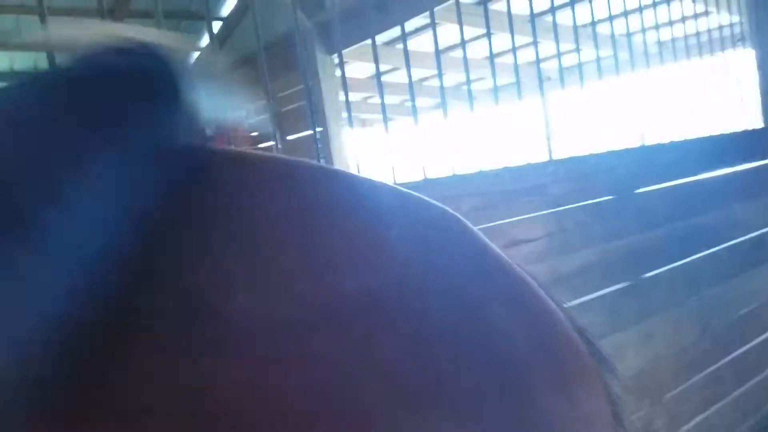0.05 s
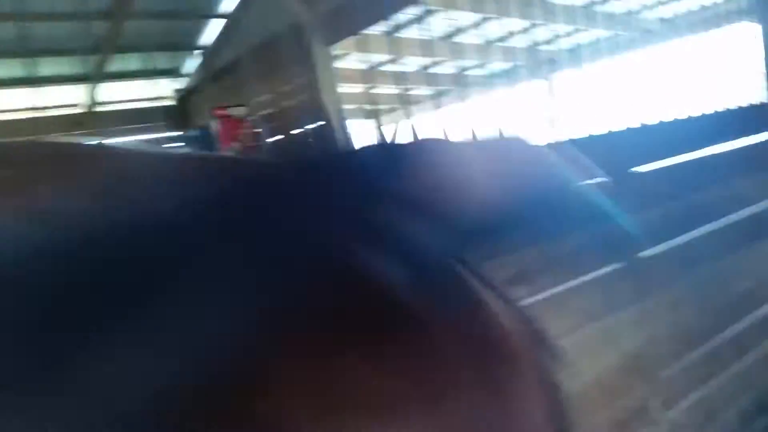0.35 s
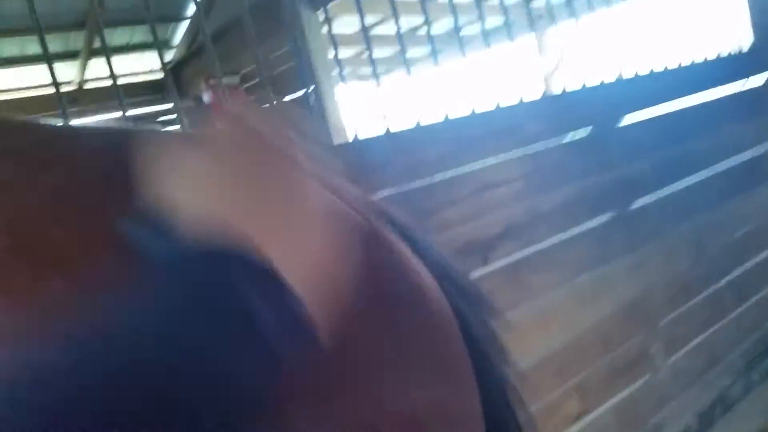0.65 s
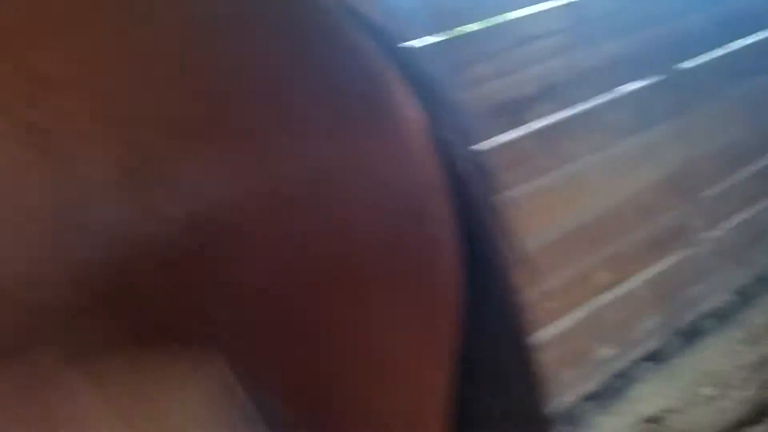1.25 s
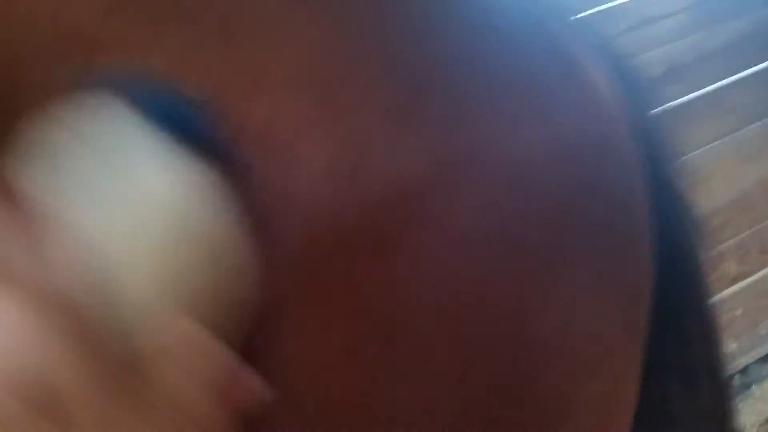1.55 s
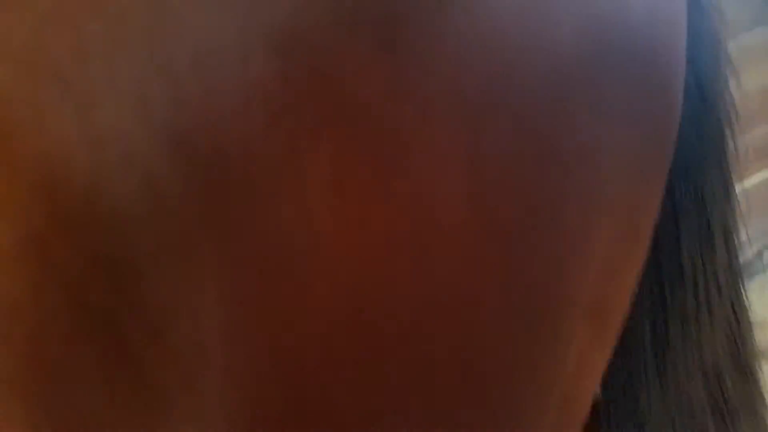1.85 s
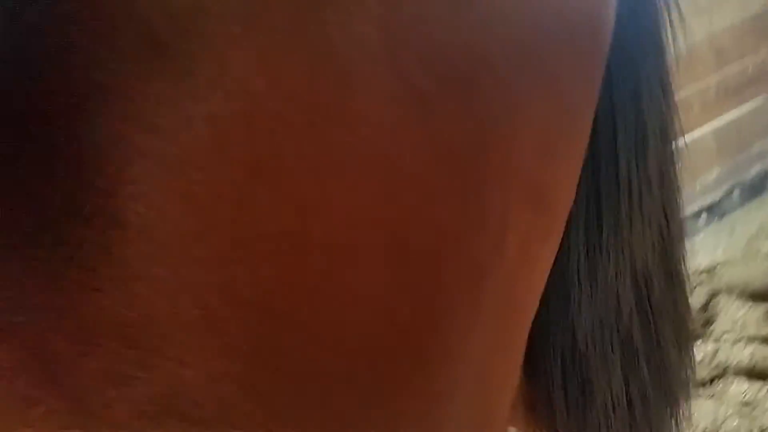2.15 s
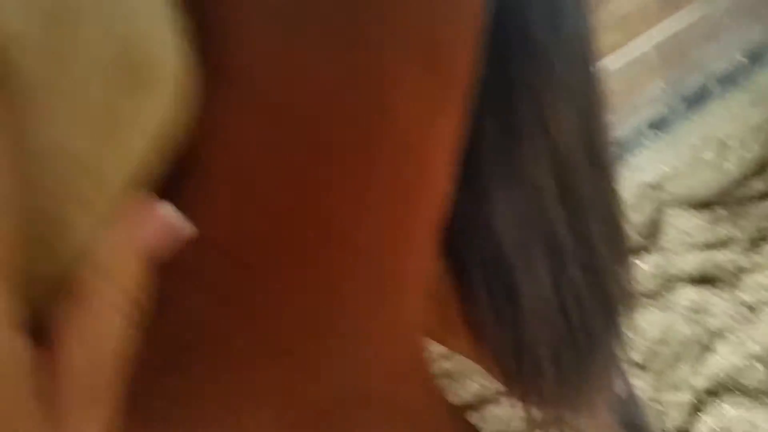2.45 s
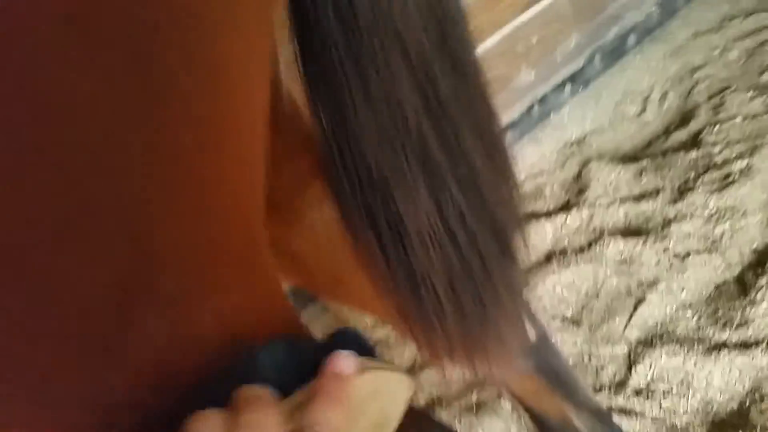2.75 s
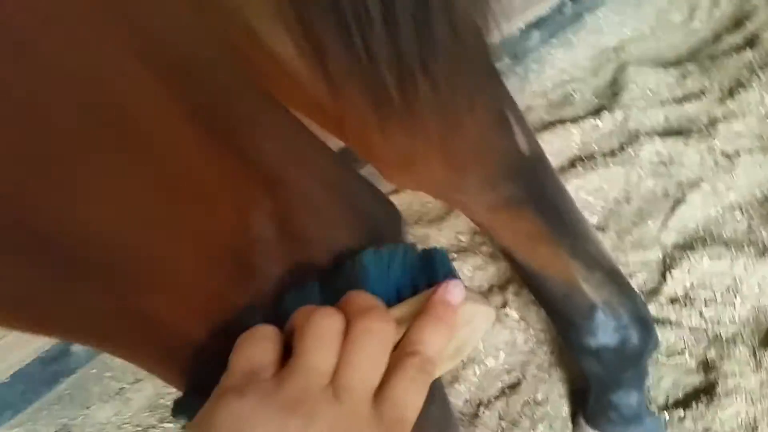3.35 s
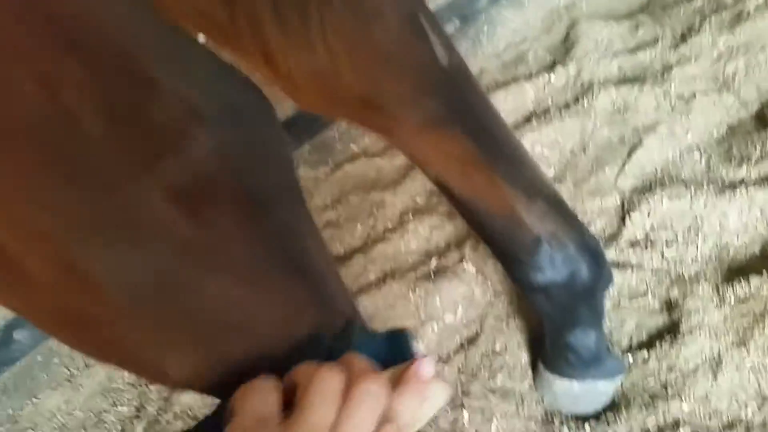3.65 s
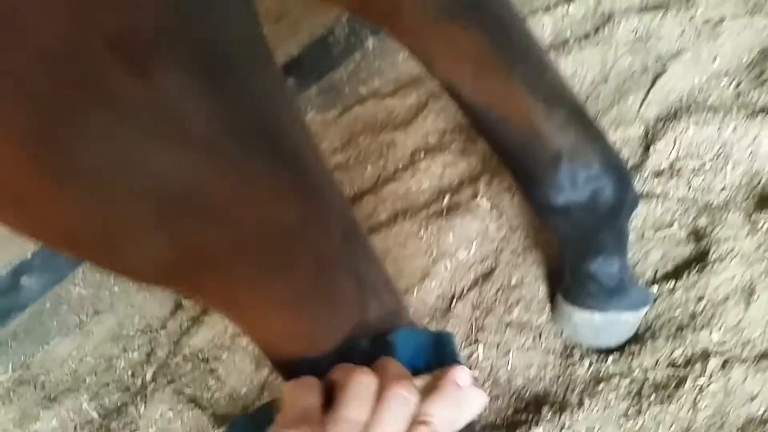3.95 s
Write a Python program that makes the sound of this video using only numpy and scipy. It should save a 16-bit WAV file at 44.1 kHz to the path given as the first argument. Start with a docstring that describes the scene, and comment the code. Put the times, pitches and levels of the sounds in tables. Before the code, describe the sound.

Close, quiet brush strokes hiss and rub through a horse's coat, followed by a run of low, soft knocks as the brushing continues. The barn hums faintly behind, and the hand-held microphone rumbles a little.

```python
"""Brush strokes swish through a horse's coat, close to a hand-held camera in a wooden stall.
Each stroke hisses at the bristle tips and rubs a dull note out of the body. Now and then the brush
judders or a bristle ticks; later it bumps along the flank and leg. Behind it lie the barn's low
drone and hum, the rumble of the moving camera and the hiss of two unlike microphones."""
import sys
import numpy as np
from scipy.fft import rfft, irfft, next_fast_len
from scipy.io import wavfile
from scipy.ndimage import map_coordinates

SR = 44100
rng = np.random.default_rng(int(sys.argv[2]) if len(sys.argv) > 2 else 0)


def wrap_up_sound(samples):
    """Save the sound to the file named by the first command line argument, as 16-bit audio."""
    columns = np.atleast_2d(samples).T
    # keep every value between -1 and 1, then stretch to whole-number steps
    tamed = np.clip(columns, -1, 1)
    steps = np.round(tamed * 32767).astype(np.int16)
    wavfile.write(sys.argv[1], SR, steps)


N = 176400
TIME = np.arange(N) / SR

# The coat, rump and flank from close by. Each row: frequency in Hz, relative level in dB.
COAT_SPECTRUM = [(200, -55), (600, -0.5), (1000, 2.5), (1700, 1.5), (2500, 2.5), (4000, 3.5), (5600, -1.5),
                 (7200, 3), (10000, -9), (12500, -7), (15000, -4)]
RUMP_SPECTRUM = [(60, -42), (170, -1), (280, 3.5), (390, -2.5), (450, -3), (510, -5.5), (640, -11.5),
                 (1100, -16.5), (2500, -17), (6000, -53)]
FLANK_SPECTRUM = [(60, -28), (190, 5), (250, -1), (370, -3), (440, -12.5), (700, -18), (1100, -19.5),
                  (2500, -35), (6000, -50)]
# The swish leans to the left microphone. Each row: frequency in Hz, left minus right in dB.
COAT_LEAN = [(500, 9), (1500, 5.5), (3000, 4), (5200, 0.5), (7200, 6.5), (9500, 20), (12000, 27),
             (14500, 6)]


def brush(flank_from_s=2.3):
    """Each stroke drives the swish of the hair, the hiss of the tips and the rub on rump or flank."""
    hair = unit(filtered(rush(COAT_SPECTRUM), lambda hz: pan(along(COAT_LEAN, hz))))
    hair *= flutter(rate=500, rough_db=0.44)
    hair *= pressure(layer=0, arch_db=5.5, touch_db=4.5, lift_db=7, rise_db_per_s=80, fall_db_per_s=111)
    tips = unit(tip_noise() * pan(-10.5)) * flutter(rate=130, rough_db=1)
    tips *= pressure(layer=1, arch_db=5.5, touch_db=4.5, lift_db=7, rise_db_per_s=126, fall_db_per_s=256)
    rub = np.where(TIME > flank_from_s, rush(FLANK_SPECTRUM), rush(RUMP_SPECTRUM)) * pan(2.4)
    rub *= flutter(rate=60, rough_db=2.5)  # bristles catch and slip in clumps
    rub *= pressure(layer=2, arch_db=7, touch_db=2, lift_db=9, rise_db_per_s=175, fall_db_per_s=128)
    return hair + tips + hollow(rub)


# Each row: touch, time to hardest pressure and length in seconds, then swish, hiss and rub in dB.
BRUSH_STROKES = [(0.264, 0.093, 0.16, -66.5, -64, -61), (0.397, 0.045, 0.038, -56, -41.5, -52),
                 (0.683, 0.15, 0.23, -64.5, -70, -52), (0.915, 0.05, 0.27, -52.5, -44.5, -48.5),
                 (1.113, 0.076, 0.31, -60, -66, -53.5), (1.44, 0.17, 0.23, -67.5, -78, -51.5),
                 (1.664, .07, 0.19, -51, -51, -57.5), (1.797, 0.089, .19, -45.5, -38, -55.5),
                 (2.002, 0.035, 0.2, -59, -68, -53.5), (2.363, 0.072, 0.22, -63, -63.5, -56),
                 (2.605, 0.13, 0.19, -49, -50, -60), (2.756, 0.064, 0.29, -56, -48.5, -43),
                 (3.047, 0.058, 0.23, -57, -49, -49.5), (3.256, 0.23, 0.54, -58, -53.5, -55.5),
                 (3.693, 0.043, 0.32, -57, -46.5, -48.5)]


def pressure(layer, arch_db, touch_db, lift_db, rise_db_per_s, fall_db_per_s, contact_s=0.015):
    """Gain of one layer: a stroke swells in, steps up on contact, arches, drops on lifting and fades."""
    power = 0
    for touch, hardest, length, *levels in BRUSH_STROKES:
        t = TIME - touch
        before, after = np.maximum(-t, 0), np.maximum(t - length, 0)
        arch = arch_db * np.interp(t, [0, min(hardest, length), length], [1, 0, 1])
        steps = touch_db * np.minimum(before / contact_s, 1) + lift_db * np.minimum(after / contact_s, 1)
        fades = rise_db_per_s * before + fall_db_per_s * after
        power += amp(levels[layer] - arch - steps - fades) ** 2
    return np.sqrt(power)


def tip_noise(centre_hz=14680, width_hz=2170):
    """The bristle tips hiss in one broad, very high band; stereo, rms 1."""
    noise = rng.standard_normal((2, N))
    return unit(filtered(noise, lambda hz: 1 / (1 + np.abs((hz - centre_hz) / width_hz) ** 3.8)))


# Resonances under the brush. Each row: frequency in Hz, width in Hz, gain in dB.
HOLLOW_MODES = [(197.3, 9.2, 1), (251, 13, -3), (307.4, 14.6, 0), (379, 32, 0.5), (514, 16, 0)]


def hollow(rub, direct_db=-4):
    """The rub is heard directly and through the hollow resonances it sets ringing."""
    def ring(f):
        return sum(amp(db) * 1j * f * width / (hz * hz - f * f + 1j * f * width)
                   for hz, width, db in HOLLOW_MODES)
    return filtered(rub, lambda f: amp(direct_db) + ring(f))


# Each row: middle and half length in seconds, centre in Hz, glide in octaves a second, level in dB.
JUDDERS = [(0.377, 0.037, 426, 0.069, -53), (1.021, 0.057, 517, 0, -54.5), (1.156, 0.031, 500, 0, -57),
           (1.221, 0.039, 282, 0.043, -52), (1.688, 0.055, 2570, 1.9, -58.5),
           (1.785, 0.073, 2980, .8, -59.5), (2.053, 0.016, 3700, 0, -58),
           (2.124, 0.0126, 2900, 0.11, -59.5), (2.654, 0.18, 2330, 0, -64),
           (2.713, 0.008, 286, 0.05, -39.5), (2.728, 0.023, 940, 0, -60), (3.26, .014, 353, 0, -51),
           (3.702, 0.054, 507, 0.033, -55.5)]


def judders(relative_width=0.13):
    """The brush judders in a narrow band: low where the hide drags, high where bristles chatter."""
    out = 0
    for middle, half_length, hz, glide, db in JUDDERS:
        white = rush([(hz, 0)])
        band = unit(filtered(white, lambda f: 1 / (1 + ((f / hz - 1) / relative_width) ** 2)))
        t = TIME - middle
        if glide:  # the pitch rises as the brush speeds up
            travel = np.cumsum(2 ** (glide * np.clip(t, -2 * half_length, 2 * half_length)))
            band = np.array([np.interp(travel, np.arange(N), side, period=N) for side in band])
        out += amp(db) * band * np.exp(-(t / half_length) ** 2)
    return out * pan(5)


# Bumps, nearly centred. Each row: start in seconds, level in dB, pitch in Hz, seconds to fall 60 dB.
BODY_KNOCKS = [(2.709, -28.5, 177, 0.083), (2.732, -26, 191, 0.21), (2.741, -34, 199, 0.077),
               (2.791, -32.5, 203, 0.12), (2.902, -32, 122, 0.081), (2.968, -32.5, 193, .07),
               (2.994, -22, 101, 0.033), (3.027, -20, 130, 0.022), (3.252, -28.5, 200, 0.04),
               (3.436, -30, 148, 0.026), (3.63, -29, 124, 0.15), (3.648, -32, 197.4, 0.13),
               (3.668, -25.5, 89, 0.1), (3.723, -34, 75, .1), (3.776, -32, 133, 0.087),
               (3.799, -33, 78, 0.1), (3.858, -28, 91, .08), (3.931, -31.5, 140, 0.053),
               (3.976, -33, 76, 0.064)]
# The body's modes. Each row: ratio to the pitch, gain in dB.
BODY_MODES = [(1, 1.5), (1.45, -12), (1.66, -30), (1.96, -24)]


def knocks(attack_s=0.0036):
    """The brush bumps the horse and rings a few low, quickly damped modes."""
    out, t = np.zeros(N + SR), np.arange(SR // 2) / SR
    for start, db, hz, t60 in BODY_KNOCKS:
        ring = sum(amp(gain) * np.sin(2 * np.pi * hz * ratio * t) for ratio, gain in BODY_MODES)
        envelope = np.exp(-np.log(1000) * t / t60) * (1 - np.exp(-t / attack_s))
        out[round(start * SR):][:len(t)] += amp(db) * ring * envelope
    return out[:N] * pan(-0.98)


# Flicked bristles near the microphones. Each row: start in seconds, level in dB.
BRISTLE_TICKS = [(0.429, -67), (1.371, -53.5), (1.983, -48.5)]
# The colour of a snap. Each row: frequency in Hz, relative level in dB.
SNAP_SPECTRUM = [(400, -25.5), (1500, 3), (3000, 5), (5000, 0), (14000, -13)]


def ticks(decay_s=0.0045, tips_db=4):
    """Single bristles snap free with a tiny burst of noise."""
    bursts = sum(amp(db) * (TIME >= start) * np.exp(-np.abs(TIME - start) / decay_s)
                 for start, db in BRISTLE_TICKS)
    return bursts * (rush(SNAP_SPECTRUM) * pan(5.5) + amp(tips_db) * tip_noise() * pan(-2))


# The barn around the stall. Each row: frequency in Hz, relative level in dB.
BARN_SPECTRUM = [(20, -11.5), (42, -12), (60, -5), (74, -2), (92, -3.5), (125, -6), (170, -15), (200, -13),
                 (290, -21), (500, -27.5), (800, -28), (1400, -42), (4000, -50.5)]


def barn(level_db=-49):
    """The barn's low drone, almost steady."""
    return amp(level_db + 0.52 * wobble(8.2)) * rush(BARN_SPECTRUM) * pan(-0.34)


# Far off, equal in both microphones. Each row: frequency in Hz, level in dB.
HUM_TONES = [(74, -53), (154, -57.5)]


def hum(drift_rad=0.8, waver_db=2.5):
    """A low hum, perhaps a distant fan, wavers in pitch and level."""
    out = 0
    for hz, db in HUM_TONES:
        tone = np.sqrt(2) * np.sin(2 * np.pi * hz * TIME + drift_rad * wobble(9))
        out += tone * amp(db + waver_db * wobble(7.85))
    return out


# The hand on the camera. Each row: time in seconds, level in dB.
HANDLING_LEVELS = [(0, -61.5), (.7, -58.5), (1.2, -48), (1.4, -58), (2.7, -50.5), (2.95, -42.5),
                   (3.25, -45.5), (3.58, -47.5), (3.69, -39.5), (4, -42.5)]
# Its rumble. Each row: frequency in Hz, relative level in dB.
HANDLING_SPECTRUM = [(20, -9), (45, 1), (72, 3), (120, 1), (190, -9.5), (280, -22), (600, -27.5),
                     (1100, -32.5), (3000, -47.5)]


def handling():
    """The camera rumbles as it moves in the hand."""
    level = amp(np.interp(TIME, *np.transpose(HANDLING_LEVELS)))
    return level * flutter(rate=30, rough_db=2.5) * rush(HANDLING_SPECTRUM) * pan(-0.84)


# The microphones' own noise. Each row: frequency in Hz, relative level in dB.
LEFT_MIC_SPECTRUM = [(300, 5), (1500, -8.5), (2750, -14.5), (3350, -3.5), (4150, 4.5), (4600, -11.5),
                     (5400, -29), (6600, -29), (7300, -3), (7900, -18.5), (9000, -9), (10000, -41.5),
                     (12000, -12), (14500, -21.5)]
RIGHT_MIC_SPECTRUM = [(300, -32), (2000, 9), (4100, 8), (5300, 0), (7500, 2), (9800, -33), (12200, 6.5),
                      (14500, -11.5)]


def microphone_hiss(left_db=-56, right_db=-71):
    """The left microphone's hiss flickers; the right one's is fainter and steady."""
    left = amp(left_db) * rush(LEFT_MIC_SPECTRUM)[0] * flutter(rate=90, rough_db=1)
    right = amp(right_db) * rush(RIGHT_MIC_SPECTRUM)[1]
    return np.array([left, right])


# How alike the two microphones hear the stall. Each row: frequency in Hz, left-right correlation.
MIC_LIKENESS = [(60, 0.75), (200, 0.81), (400, 0.59), (700, 0.33), (1400, 0)]


def rush(spectrum):
    """Stereo noise of rms 1, alike in the bass and unrelated in the treble."""
    def response(hz):
        turn = np.arccos(np.clip(along(MIC_LIKENESS, hz), -1, 1)) / 2
        return amp(along(spectrum, hz)) * [np.cos(turn), np.sin(turn)]
    mid, side = filtered(rng.standard_normal((2, N)), response)
    return unit(np.array([mid + side, mid - side]))


def flutter(rate, rough_db):
    """A quick random flutter of gain, rms 1."""
    return unit(amp(rough_db * wobble(rate)))


def wobble(rate):
    """A smooth random curve, rate knots a second."""
    return map_coordinates(rng.standard_normal(N // 8), [np.arange(N) * rate / SR], mode="wrap")


def filtered(x, response):
    """Shape x by a response, a function of frequency in Hz."""
    size = next_fast_len(N + SR // 2)
    return irfft(rfft(x, size) * response(np.fft.rfftfreq(size, 1 / SR)), size)[..., :N]


def along(points, hz):
    """Interpolate (Hz, value) points on a log frequency axis."""
    freqs, values = np.transpose(points)
    return np.interp(np.log(hz + 1), np.log(freqs + 1), values)


def pan(lean_db):
    """Left and right gains; a positive lean is to the left."""
    return amp(np.array([[0.5], [-0.5]]) * lean_db)


def amp(db):
    """Decibels to gain."""
    return 10 ** (np.asarray(db) / 20)


def unit(x):
    """Scale to rms 1."""
    return x / np.sqrt(np.mean(x ** 2) + 1e-20)


def scene():
    """The grooming close up, over the barn and the camera's own noises."""
    grooming = brush() + judders() + knocks() + ticks()
    return grooming + hum() + barn() + handling() + microphone_hiss()


def record(dry):
    """The whole sound loses a narrow, steep-sided band near 6.2 kHz and all treble above 14.6 kHz."""
    notch_hz, width_hz, depth_db, top_hz = 6210, 396, 19, 14620
    notch = lambda hz: np.exp(-((hz - notch_hz) / width_hz) ** 4)
    return filtered(dry, lambda hz: amp(-depth_db * notch(hz)) * (hz < top_hz))


dry = scene()
out = record(dry)
wrap_up_sound(out)
```